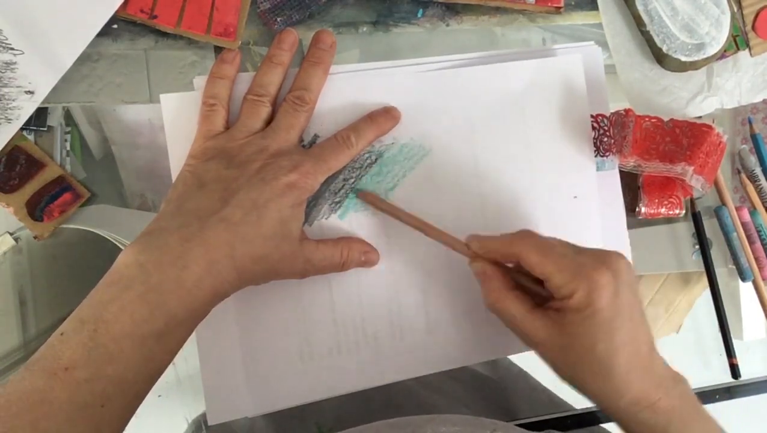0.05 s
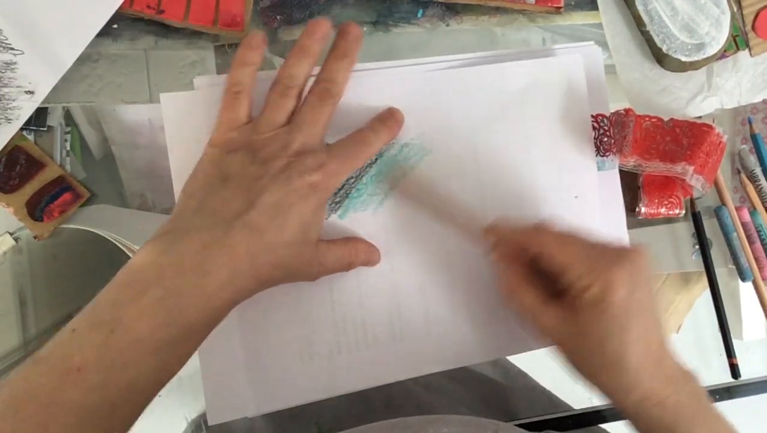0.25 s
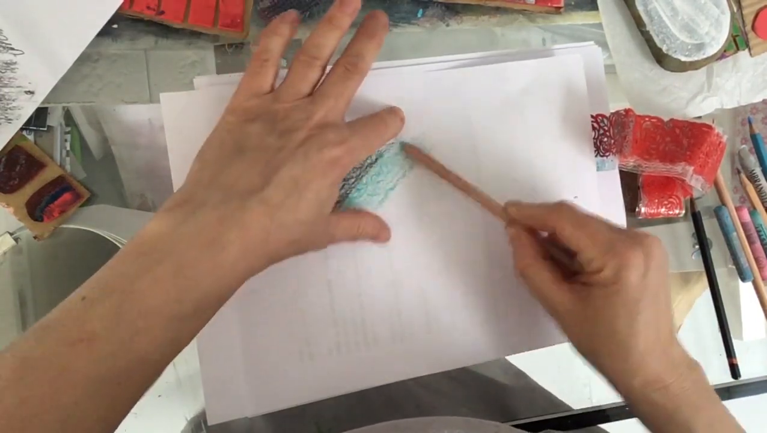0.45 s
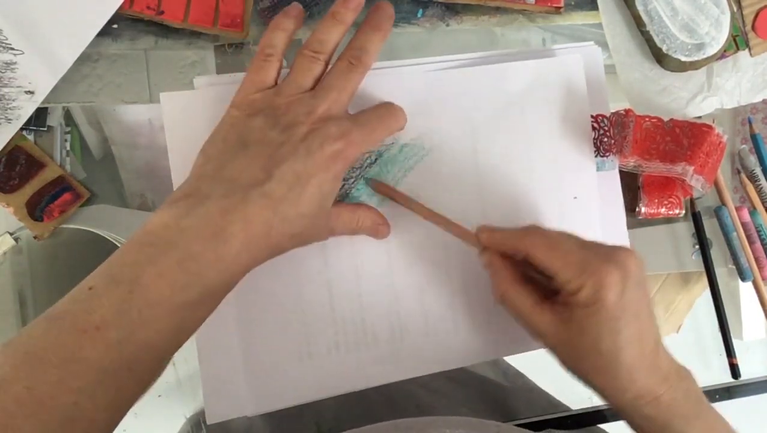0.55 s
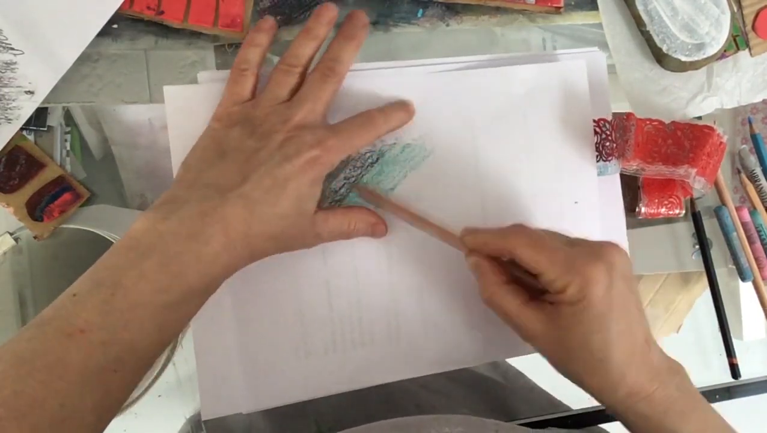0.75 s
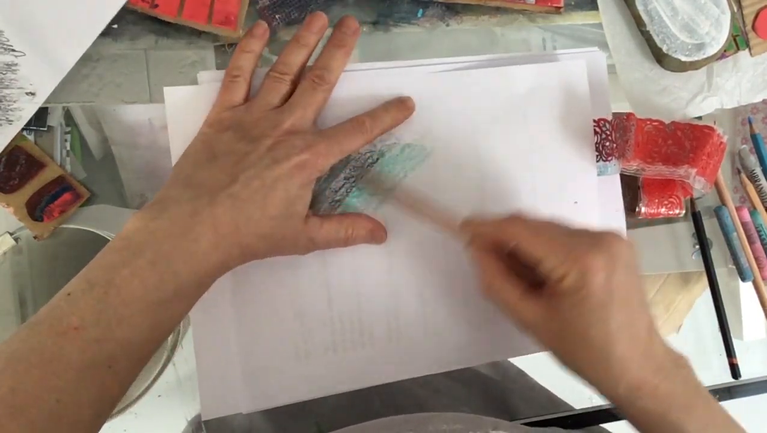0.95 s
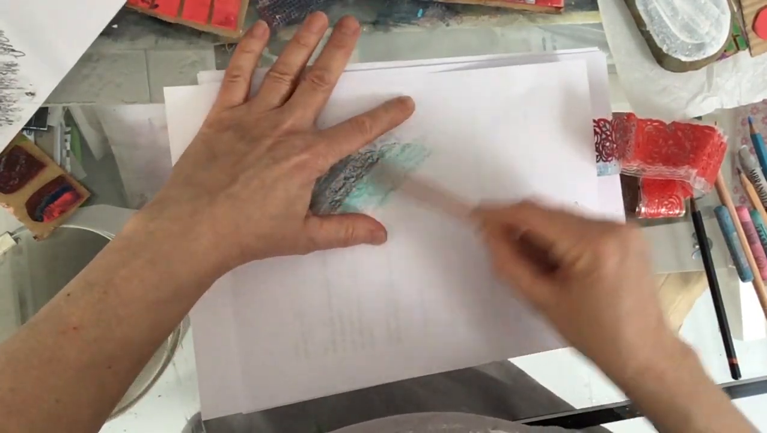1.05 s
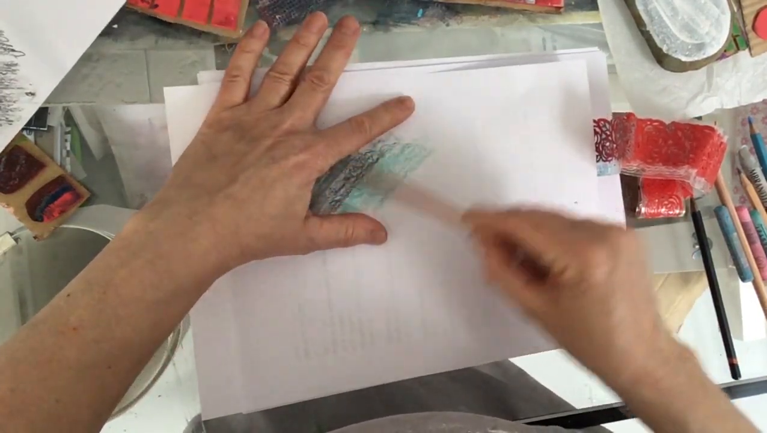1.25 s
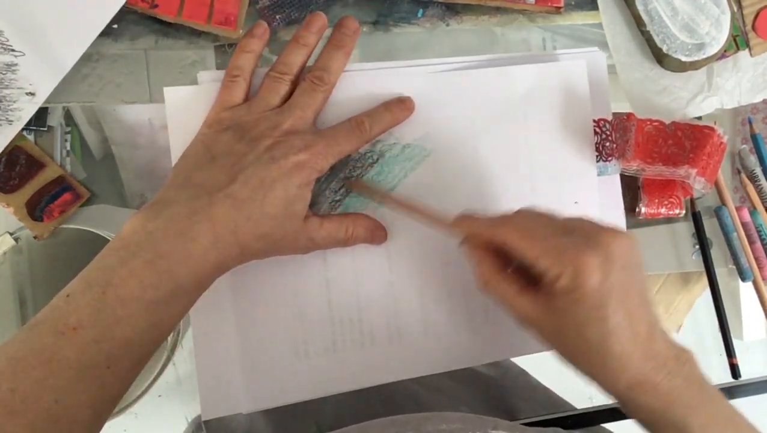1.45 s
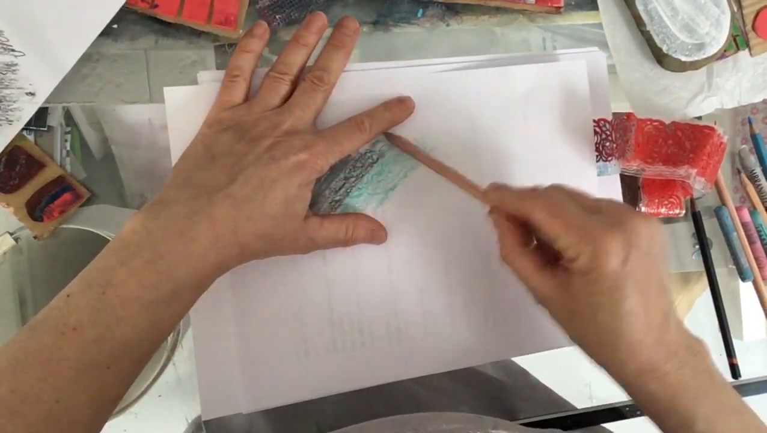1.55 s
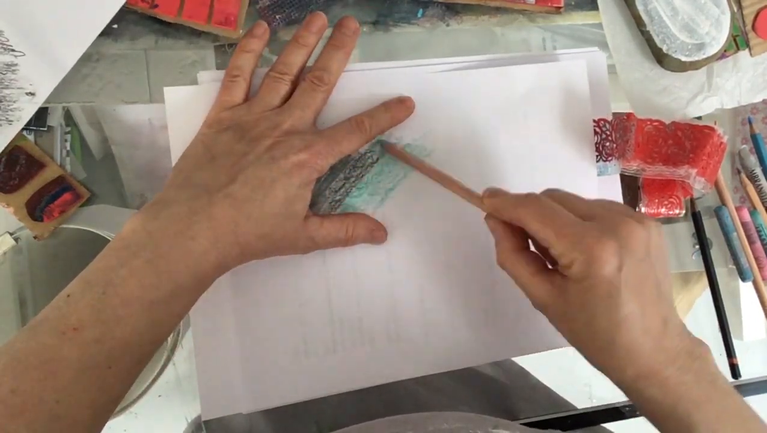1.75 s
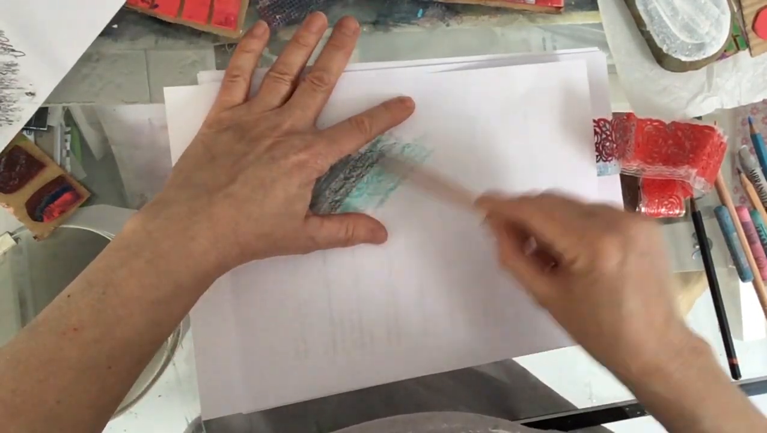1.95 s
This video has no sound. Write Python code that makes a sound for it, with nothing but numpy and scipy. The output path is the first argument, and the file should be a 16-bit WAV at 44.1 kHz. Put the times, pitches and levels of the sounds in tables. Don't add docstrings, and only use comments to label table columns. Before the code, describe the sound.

A coloured pencil shades thin paper with quick back-and-forth scratching strokes on a resonant desk indoors.

```python
import sys
import numpy as np
from scipy import signal
from scipy.io import wavfile

SR = 44100
rng = np.random.default_rng(int(sys.argv[2]) if len(sys.argv) > 2 else 0)


def gain_from_decibels(decibels):
    exponent = np.asarray(decibels, float) / 20
    return 10 ** exponent


def digitize_waveform(pressure):
    field = np.atleast_2d(pressure).T
    bounded = np.clip(field, -1, 1)
    quanta = np.round(bounded * 32767).astype(np.int16)
    wavfile.write(sys.argv[1], SR, quanta)


N = 88773


def rms_one(x):
    return x / np.sqrt(np.mean(x ** 2) + 1e-20)


def drift(rate_hz):
    r = np.exp(-2 * np.pi * rate_hz / SR)
    return rms_one(signal.lfilter([1], [1, -2 * r, r * r], rng.standard_normal(N + SR))[SR:])


def curve(rows):
    return gain_from_decibels(np.interp(np.arange(N) / SR, *np.transpose(rows)))


def band(x, hz):
    return rms_one(signal.sosfilt(signal.butter(2, hz, "band", fs=SR, output="sos"), x))


def coloured(x, spectrum, patchy_db):
    edges_hz = 25 * 2 ** (np.arange(29) / 3)
    hz, db = np.transpose(spectrum)
    out = 0
    for k, (low, high) in enumerate(zip(edges_hz, edges_hz[1:])):
        third = signal.sosfilt(signal.butter(2, [low, high], "band", fs=SR, output="sos"), x[k % 2])
        level_db = np.interp(np.log(low * high) / 2, np.log(hz), db)
        out = out + third * gain_from_decibels(level_db + patchy_db * drift(20.8))
    return rms_one(out)


def grains(rate_per_s, spread_db):
    size = gain_from_decibels(spread_db * np.minimum(rng.exponential(1, N), 4)) * rng.choice([-1, 1], N)
    return rms_one(size * (rng.random(N) < rate_per_s / SR))


def ring(x, hz, t60_s):
    r, w = gain_from_decibels(-60 / (t60_s * SR)), 2 * np.pi * hz / SR
    return signal.lfilter([0, np.sin(w)], [1, -2 * r * np.cos(w), r * r], x + 1e-18)


def body(x, modes):
    click = np.zeros(SR)
    click[0] = 1
    driven = np.r_[click, x]
    both = sum((-1) ** k * gain_from_decibels(db) * ring(driven, hz, t60_s) for k, (hz, db, t60_s) in enumerate(modes))
    return both[SR:] / np.sqrt(np.sum(both[:SR] ** 2))


def catches(rows, column, tail_s):
    out = np.zeros(N)
    for row in rows:
        out[int(row[0] * SR)] = gain_from_decibels(row[1] + (row[column] if column else 0))
    return signal.lfilter([1], [1, -np.exp(-1 / (tail_s * SR))], out)


def swells(rows):
    t = np.arange(N) / SR
    out = np.zeros(N)
    for start_s, db, hz, swell_s in rows:
        age = np.maximum(t - start_s, 0)
        out += gain_from_decibels(db) * age / swell_s * np.exp(1 - age / swell_s) * np.sin(2 * np.pi * hz * age)
    return out


# frequency in Hz, level in dB.
ROOM = [(30, 2), (60, -7), (120, -4), (330, -4.5), (800, -15.5), (2400, -24.5), (13500, -30.5),
        (15500, -45)]
# centre in s, width in s, level in dB, frequency in Hz, bandwidth in Hz.
FAR = [
    (1.7, 0.13, -67, 1845, 200),
    (1.61, 0.054, -63.5, 1750, 430),
    (.484, 0.021, -56.5, 1250, 540),
    (0.82, 0.014, -64, 1070, 530),
]


def room_tone():
    room_db = -59
    t = np.arange(N) / SR
    out = gain_from_decibels(room_db) * coloured(rng.standard_normal((2, N)), ROOM, patchy_db=3.2)
    for centre_s, width_s, db, hz, wide_hz in FAR:
        scrape = band(rng.standard_normal(N), (hz - wide_hz / 2, hz + wide_hz / 2))
        out = out + gain_from_decibels(db) * np.exp(-((t - centre_s) / width_s) ** 2) * scrape
    return out


# time in s, level in dB.
RUMBLE = [(0.0, -56.5), (0.26, -63.5), (0.52, -77), (0.56, -57.5), (0.67, -76), (0.77, -50.5), (0.83, -77),
          (0.86, -59.5), (1.16, -66), (1.19, -50.5), (1.22, -62), (1.69, -85), (1.9, -59), (2.01, -71)]
# frequency in Hz, level in dB, t60 in s.
RUMBLE_MODES = [(52.6, 7.5, 0.43), (76.1, 10.5, 0.68)]


def rumble():
    return curve(RUMBLE) * body(rng.standard_normal(N), RUMBLE_MODES)


# start in s, length in s, hiss in dB, judder in dB, desk sway in dB.
STROKES = [(-.006, 0.093, -52, -51, -49.5), (0.122, 0.12, -53, -49.5, -55.5),
           (0.245, 0.1, -51.5, -46.5, -54.5), (0.377, 0.1, -52, -50.5, -55.5),
           (0.498, 0.093, -52, -48, -49.5), (0.616, 0.085, -54, -45.5, -53), (0.72, 0.097, -51, -52, -48.5),
           (0.837, 0.082, -48, -50, -51), (0.923, 0.11, -50, -60.5, -52.5),
           (1.064, 0.078, -50.5, -50.5, -58.5), (1.167, 0.078, -53, -50, -53),
           (1.273, 0.081, -51.5, -51.5, -58), (1.379, 0.095, -55.5, -50, -53),
           (1.491, 0.091, -53, -49, -54.5), (1.604, 0.099, -57, -55, -75), (1.726, 0.077, -54, -51.5, -60),
           (1.835, 0.082, -56, -46.5, -58), (1.945, 0.069, -51.5, -43, -58)]


def speed(column, lag_s, rise_s, fall_s):
    arch_db = 5.5
    t, out = np.arange(N) / SR, np.zeros(N)
    for row in STROKES:
        age, length_s = t - row[0], row[1]
        rise = np.clip((age - lag_s) / rise_s, 0, 1)
        fall = np.clip((length_s + fall_s / 2 - age) / fall_s, 0, 1)
        arch = gain_from_decibels(row[column] - arch_db * (2 * age / length_s - 1) ** 2)
        out += arch * np.sin(np.pi / 2 * rise * fall) ** 2
    return out


# frequency in Hz, level in dB per Hz.
PAPER = [(500, 3), (1500, -0.5), (2500, -7), (4200, -1), (6500, -1), (9500, 1), (13800, -4.5), (15600, -7)]
# time in s, level in dB re hiss.
BLUNT = [(0, -9), (.3, -3.5), (.7, -6.5), (1.0, -31), (1.5, -11), (2.0, -8)]


def friction():
    blunt_hz = (1990, 5720)
    sheet_hz, sheet_width_hz, sheet_db = 6650, 470, -10.5
    grain = 0.7 * grains(2300, spread_db=13.0)
    x = coloured(rng.standard_normal((2, N)) + grain, PAPER, patchy_db=2.0)
    x = x + curve(BLUNT) * band(rng.standard_normal(N) + grain, blunt_hz)
    sheet = signal.lfilter(*signal.iirpeak(sheet_hz, sheet_hz / sheet_width_hz, SR), x)
    return x + gain_from_decibels(sheet_db + 0.57 * drift(18)) * sheet


# time in s, gain of the brightest hiss in dB.
EDGE = [(0, 0.5), (.25, 2.5), (.45, -6), (.7, -0.5), (.9, -0.5), (1.2, 0), (1.5, 1), (1.75, -1), (2.0, 1.5)]


def stroke_hiss(rub):
    air = signal.sosfilt(signal.butter(1, 8500, "high", fs=SR, output="sos"), rub)
    dull = (rub - air) * speed(column=2, lag_s=0, rise_s=0.016, fall_s=0.04)
    bright = curve(EDGE) * air * speed(column=2, lag_s=0, rise_s=0.026, fall_s=0.04)
    return (dull + bright) * gain_from_decibels(1.1 * drift(180))


# time in s, peak in dB, shaft ring in dB re peak, crack in dB re peak.
RIDGES = [(0.052, -34.5, -27, -11), (0.156, -35.5, -6.5, -6), (0.169, -31.5, -14, -6),
          (0.209, -43, -19, -17), (0.283, -33, -5, 3.5), (0.305, -34, -6.5, -8), (0.412, -37, -24, -7),
          (0.426, -38.5, -8.5, -10), (0.53, -40, -14, -30), (0.553, -45, -7, 1), (0.638, -40, -4.5, -2.5),
          (0.676, -47.5, 5.5, -30), (0.743, -36, -16.5, -32), (0.773, -38.5, -3, -27),
          (0.853, -37.5, -10, -5), (0.886, -42, 5.5, -36), (0.972, -38.5, -0.5, 7.5),
          (1.102, -34.5, -8, -13), (1.123, -45, 5, -10), (1.201, -33.5, -3.5, -8), (1.237, -37, -4.5, -5),
          (1.293, -40, -5.5, -4.5), (1.417, -36.5, -11, -8), (1.511, -35, -30, -10), (1.548, -36, -9, -30),
          (1.647, -38, -9.5, -7), (1.736, -36.5, -12.5, -9), (1.763, -33.5, -42, -31),
          (1.859, -30, -13, -20), (1.962, -32, -12, -25)]
# time in s, peak in dB, shaft ring in dB re peak, crack in dB re
MORE_RIDGES = [
    (0.391, -52, -10, -4),
    (0.444, -45, -3.5, -10),
    (0.986, -48.5, 5, -26),
    (0.999, -37, -5.5, -20),
    (1.434, -38.5, -20, -10),
    (1.779, -38, -4, -10),
    (1.892, -31, -28, -13),
    (2.006, -29.5, -9.5, -9),
]
# frequency in Hz, level in dB, t60 in s.
TIP = [(1740, -6, 0.017), (2760, 5.5, 0.0053), (4150, 0, 0.011), (6500, 4, 0.003)]


def cracks(rub):
    rise_s, fall_s, crack_db, tip_db = 0.0006, 0.003, -6, -1.5
    r = np.exp(-1 / (rise_s * SR))
    sudden = catches(RIDGES + MORE_RIDGES, column=3, tail_s=fall_s)
    burst = gain_from_decibels(crack_db) * signal.lfilter([1 - r], [1, -r], sudden)
    return gain_from_decibels(tip_db) * body(burst * rng.standard_normal(N), TIP) + 0.12 * rub * burst


# frequency in Hz, width in Hz, depth from 0 to 1.
DIPS = [(4894, 350, 0.83), (2870, 49, 0.23), (8380, 1220, 0.32), (10100, 1250, 0.31)]


def hiss():
    rub = friction()
    x = cracks(rub) + stroke_hiss(rub)
    for hz, width_hz, depth in DIPS:
        x = x - np.clip(depth, 0, 1) * signal.lfilter(*signal.iirpeak(hz, hz / width_hz, SR), x)
    return x


def jolt(column, tail_s):
    jolt_db, knock_db, knock_hz = -13, 18, 2500
    knock = gain_from_decibels(knock_db) * catches(RIDGES + MORE_RIDGES, column, 1 / (2 * np.pi * knock_hz))
    chatter = rng.standard_normal(N) * catches(RIDGES + MORE_RIDGES, column, tail_s)
    return gain_from_decibels(jolt_db) * (knock + chatter)


# frequency in Hz, level in dB, t60 in s.
DESK = [(281, -7.5, 0.1), (348.6, -4.5, 0.083), (383.4, 0, 0.07), (420.4, 1.5, 0.07), (538, -3.5, 0.085),
        (593.3, -3.5, 0.093), (697.3, -7.5, 0.089), (820, -8.5, 0.041)]
SHAFT = [(971, 3.5, 0.043), (988, -6.5, 0.1), (1134.5, -13, 0.13), (1237, -4.5, 0.076), (1313, 3, 0.038),
         (1575, -9.5, 0.024), (1886, -4.5, 0.025), (1404, 5, 0.015), (2330, -10, 0.0084)]


def judder():
    desk_db, shaft_db, shaft_jolt_db = -2, -9.5, 2.5
    bumps = [grains(500, spread_db=7.5) + 1.67 * rng.standard_normal(N) for _ in "ab"]
    level = speed(column=3, lag_s=0.023, rise_s=0.0054, fall_s=0.13)
    desk_push = rms_one(bumps[0]) * level + jolt(column=0, tail_s=0.0076)
    shaft_push = rms_one(bumps[0] + bumps[1]) * level * gain_from_decibels(shaft_db)
    shaft_push = shaft_push + gain_from_decibels(shaft_jolt_db) * jolt(column=2, tail_s=0.013)
    return gain_from_decibels(desk_db) * body(desk_push, DESK) + body(shaft_push, SHAFT)


# start in s, peak in dB, frequency in Hz, swell in s.
BOOMS = [(.03, -47.5, 393, 0.0095), (.163, -36.5, 395, 0.0077), (.205, -43, 402, 0.0064),
         (.283, -45.5, 392, 0.021), (.298, -43.5, 401.4, .009), (.41, -48, 544, 0.0052),
         (.424, -41.5, 311, 0.0065), (.436, -39.5, 394.7, 0.0085), (.455, -39.5, 394, 0.0052),
         (.528, -47.5, 546, 0.013), (.548, -47, 357, 0.0065), (.643, -42, 391, 0.0043),
         (.668, -46, 392, 0.012), (.7, -50, 415, 0.0059), (.741, -38, 370, 0.008),
         (.765, -43.5, 379, 0.0078), (.855, -46, 383, 0.008), (.872, -46, 394, 0.005),
         (.897, -48, 420, 0.0069), (.972, -42.5, 362, 0.0055), (.988, -45, 562, 0.0054),
         (.992, -42.5, 312, .006), (1.1, -46.5, 398, .007), (1.203, -44.5, 560, 0.0076),
         (1.214, -48.5, 393, 0.011), (1.294, -44, 394, 0.013), (1.425, -41, 392, 0.0089),
         (1.51, -56, 360, 0.0061), (1.545, -40, 365, 0.0047), (1.65, -51, 422, 0.009),
         (1.762, -39.5, 411.3, 0.011), (1.856, -40, 580, 0.0026), (1.96, -45.5, 426, .008),
         (1.992, -40.5, 383, 0.0095)]


def panel_booms():
    return swells(BOOMS)


# frequency in Hz, level in dB, t60 in s.
SWAY = [(174.1, -10.5, 0.27), (215.2, -10, 0.15)]


def sway():
    brake_share, width_s = 0.53, 0.04
    t, push = np.arange(N) / SR, np.zeros(N)
    for start_s, length_s, _, _, db in STROKES:
        push += gain_from_decibels(db) * np.exp(-((t - start_s - brake_share * length_s) / width_s) ** 2)
    return body(push * rng.standard_normal(N), SWAY)


# start in s, peak in dB, frequency in Hz, swell in s.
SWINGS = [(.06, -52, 186, 0.016), (.19, -47, 202.5, 0.0094), (.325, -45.5, 188, 0.0091),
          (.555, -46.5, 62, 0.017), (.6, -49, 71, 0.011), (.8, -47.5, 201, 0.0093), (.9, -49, 180, 0.016),
          (.93, -57, 67.4, .014), (.983, -52, 258, 0.014), (1.245, -46, 189, 0.0081),
          (1.32, -46, 185.5, 0.0079), (1.442, -51, 182, 0.01), (1.688, -46, 190, 0.01),
          (1.78, -47, 187, 0.0079), (1.898, -44, 174, 0.01)]


def desk_swings():
    return swells(SWINGS)


# time in s, peak in dB.
SNAPS = [(0.1655, -39), (0.1804, -35), (0.305, -38), (0.4216, -35.5), (.428, -34), (.443, -35),
         (0.553, -34), (.637, -37), (.9715, -41), (1.088, -43), (1.2374, -44), (1.292, -36), (1.736, -45),
         (1.964, -42)]


def snaps():
    return gain_from_decibels(-7.5) * band(rng.standard_normal(N), (3800, 16000)) * catches(SNAPS, column=0, tail_s=0.00075)


# start in s, peak in dB, frequency in Hz, swell in s.
THUDS = [(.304, -39, 600, .001), (.645, -39, 1350, .002), (.887, -40, 1240, .003),
         (1.1215, -38, 1350, .0015), (1.237, -36, 700, .0007), (1.8925, -35, 520, .0008),
         (.391, -47, 700, .0015), (1.51, -45, 650, .0015), (.875, -42, 1330, .003), (.755, -44, 1250, .004),
         (1.2375, -41, 1340, .002)]


def thuds():
    return swells(THUDS)


def reflections(x):
    echo_db, decay_s, wall_hz = -19, 0.02, 3350
    t = np.arange(SR // 4) / SR
    tail = band(rng.standard_normal(len(t)), (100, wall_hz)) * np.exp(-t / decay_s) * (t > 0.003)
    return gain_from_decibels(echo_db) * signal.fftconvolve(x, tail / np.sqrt(np.sum(tail ** 2)))[:N]


def scene():
    near = hiss() + judder() + panel_booms() + thuds() + snaps()
    low = gain_from_decibels(-2.5) * sway() + desk_swings() + rumble()
    return (near + reflections(near) + low + room_tone())[None]


def roll_off(x):
    return signal.sosfilt(signal.butter(12, 15800, fs=SR, output="sos"), x)


def record(dry):
    x = signal.sosfilt(signal.butter(3, 43, "high", fs=SR, output="sos"), dry)
    x = signal.sosfilt(signal.ellip(10, 0.5, 60, 15600, fs=SR, output="sos"), x)
    return roll_off(x)


dry = scene()
out = record(dry)
digitize_waveform(out)
```